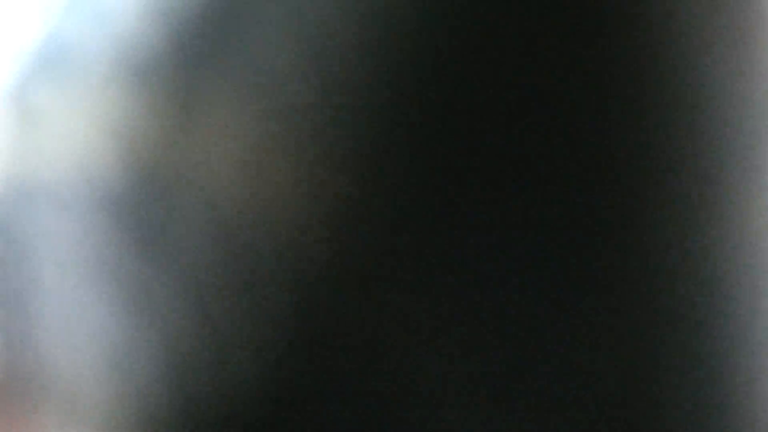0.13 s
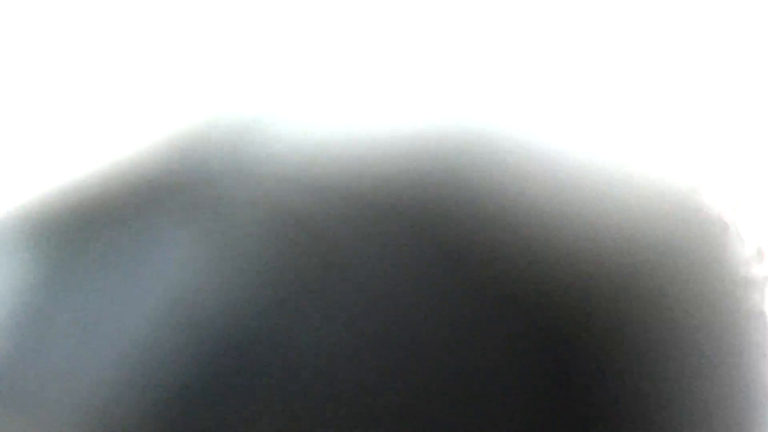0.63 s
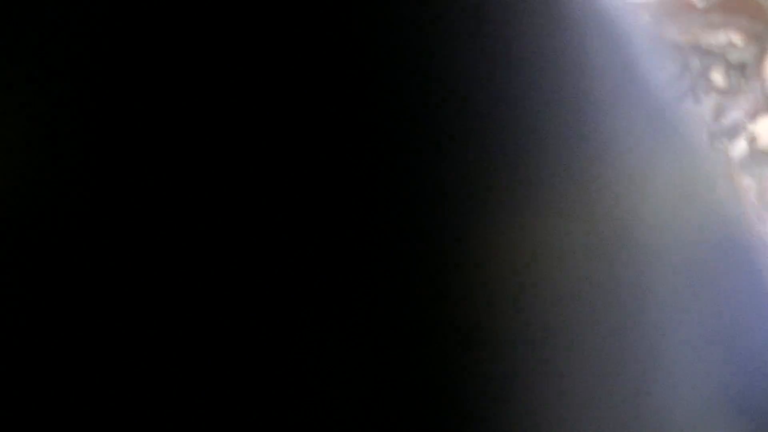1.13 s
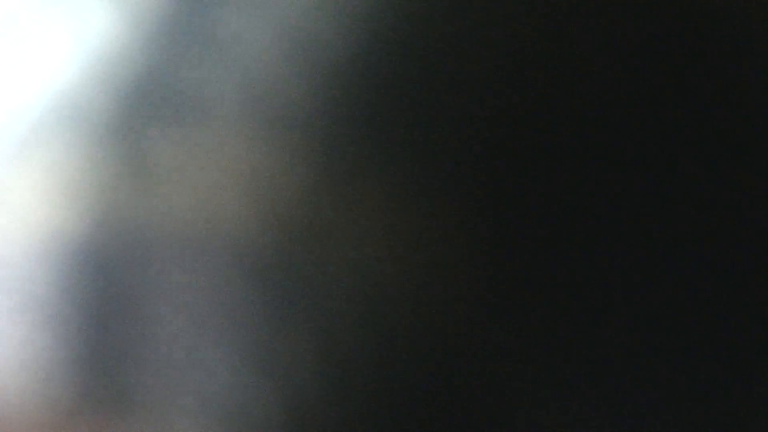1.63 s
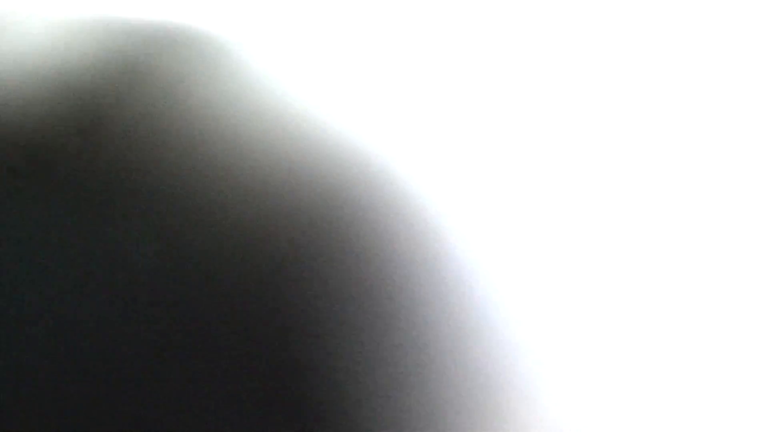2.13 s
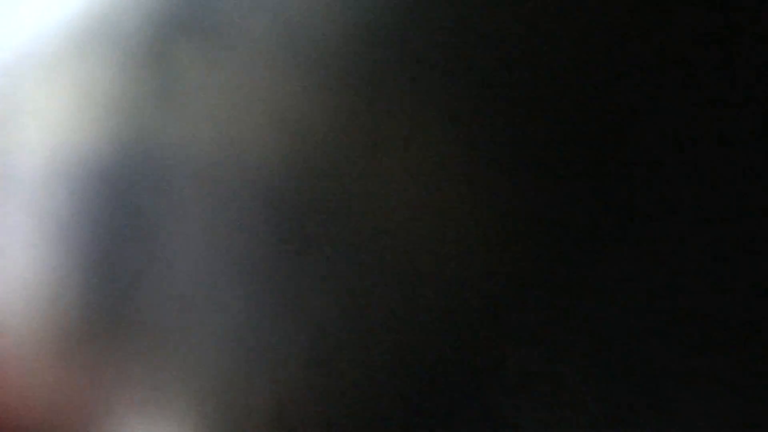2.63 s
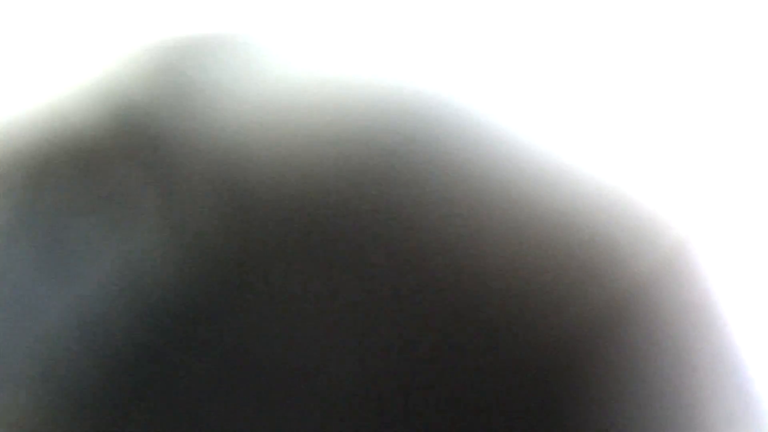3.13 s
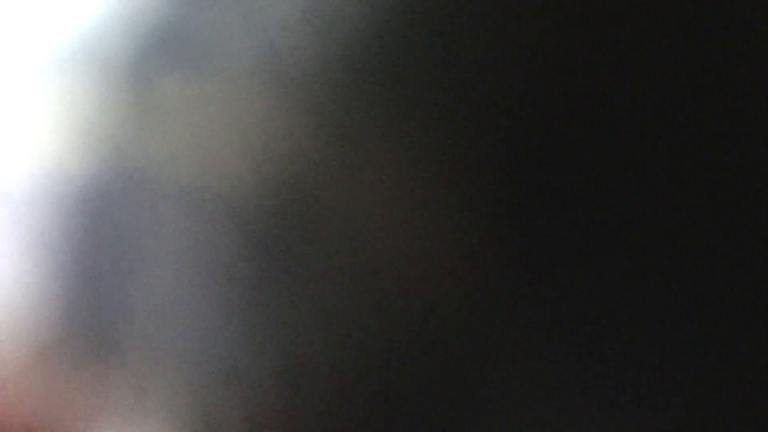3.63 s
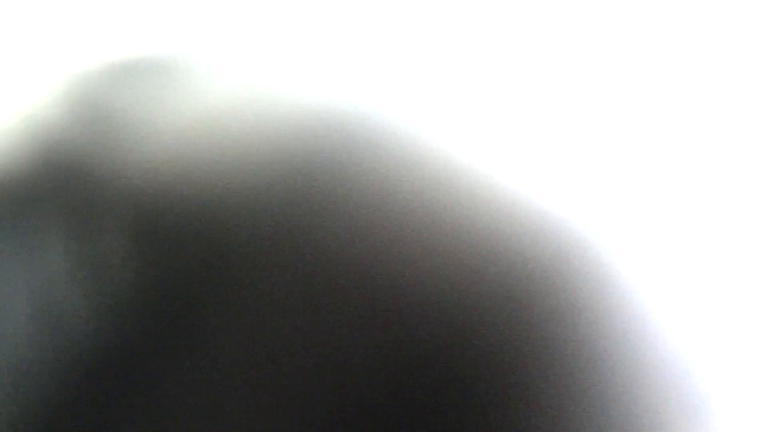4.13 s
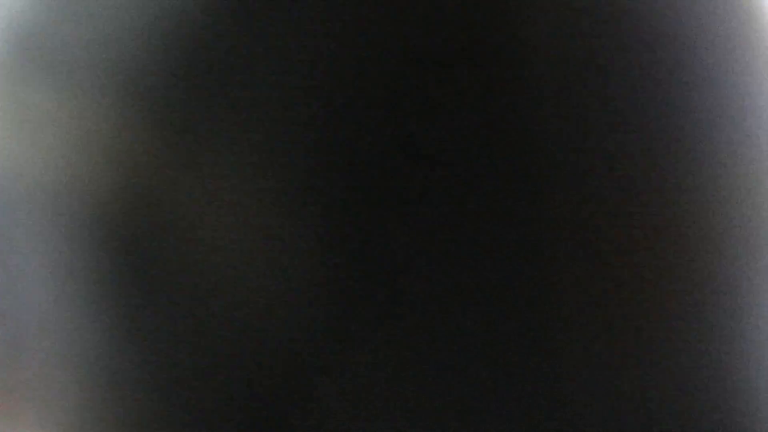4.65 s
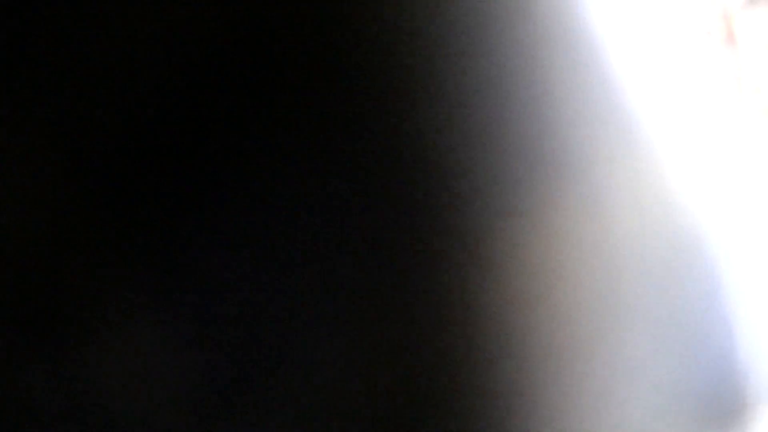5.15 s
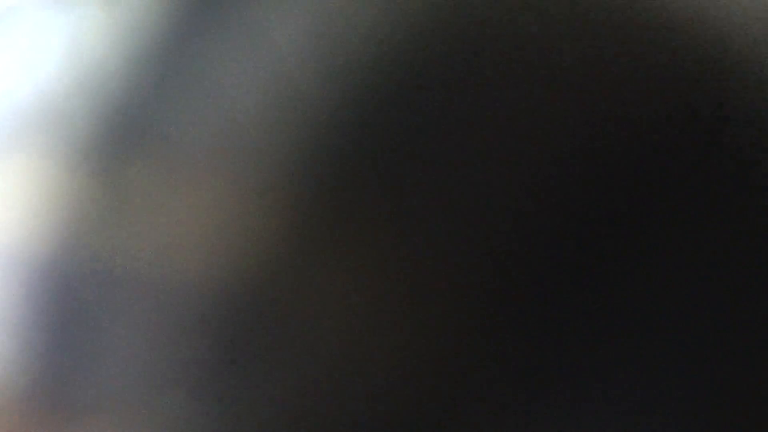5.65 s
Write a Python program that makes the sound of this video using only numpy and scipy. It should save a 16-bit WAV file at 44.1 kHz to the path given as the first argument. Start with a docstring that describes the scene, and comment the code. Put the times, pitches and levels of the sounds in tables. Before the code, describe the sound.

A hand rubs a plastic camera lens in quick scratchy circles right against the microphone, with sharp crackling snaps and dull handling thuds.

```python
"""Outdoors, a hand wipes a camera lens in quick circles right beside the built-in stereo microphone.
Stick-slip friction excites it: thousands of tiny slips a second ring the plastic lens barrel and rim,
or rustle softly over the glass as shaped noise. Skin catches and snaps free in short cracks, the grip
bumps the housing in damped low tones and rumbles through it as low-frequency noise, and a smooth wash
of noise over a wavering low drone lies underneath."""
import sys
import numpy as np
from scipy import signal
from scipy.fft import rfft, irfft, next_fast_len
from scipy.io import wavfile
from scipy.ndimage import uniform_filter1d

SR = 44100
rng = np.random.default_rng(int(sys.argv[2]) if len(sys.argv) > 2 else 0)


def how_loud(loudness_db):
    """Turn decibels into a plain amplitude multiplier (0 dB gives 1, 20 dB gives 10)."""
    steps = np.asarray(loudness_db, float) / 20
    return 10 ** steps


def master(y):
    """Save y as 16-bit WAV."""
    cut = np.clip(np.atleast_2d(y).T, -1, 1)
    pcm = np.round(cut * 32767)  # scale
    wavfile.write(sys.argv[1], SR, pcm.astype(np.int16))


N = 254456  # length [samples]


def evened(x):
    """Power normalization: scales a signal to rms 1."""
    return x / np.sqrt(np.mean(x ** 2) + 1e-20)


def read(points, hz):
    """Spectral envelope: interpolates levels along a log-frequency axis."""
    f, value = np.transpose(points)
    return np.interp(np.log(hz + 1), np.log(f + 1), value)


def add(mix, s, sound):
    """Linear superposition: mixes a two-channel sound in at time s."""
    part = mix[:, round(s * SR):][:, :sound.shape[1]]
    part += sound[:, :part.shape[1]]


def ring(modes, hz):
    """Modal resonance: gain of steep-sided resonances, with hollows between them."""
    power = sum(how_loud(db) ** 2 / (1 + (2 * (hz - f) / width) ** 2) ** 3 for f, width, db in modes)
    return np.sqrt(power)


# difference of the two ports: (frequency [Hz], left-right difference above what both share [dB])
SAME = [(60, -17), (92, -2), (140, -5.5), (210, -6.5), (330, -6.5), (500, -5), (770, -8), (1170, -3.5),
        (1790, -27.5), (2740, -2), (4190, -14), (6410, -3.5), (9810, -1), (15000, 2)]
# balance of the two ports: (frequency [Hz], left over right [dB])
LEFT = [(60, -4.0), (180, -1.5), (550, -1.5), (1650, -1.5), (4970, 0.5), (15000, -1.5)]


def ports(a, b, hz):
    """Interchannel coherence: two ports share spectrum a, differ by b; treble reaches the left first."""
    lead = np.clip(0.48 * hz ** 2 / (hz ** 2 + 5000 ** 2), 0, 1)
    # a quarter-cycle share of the common sound advances the left port's phase
    apart = how_loud(read(SAME, hz)) * (lead * 1j * a + np.sqrt(1 - lead ** 2) * b)
    tilt = how_loud(read(LEFT, hz) / 2)
    return np.array([(a + apart) * tilt, (a - apart) / tilt])


def murk(colour, patchy_db, size):
    """Filtered noise: random short-time spectra with drifting patches, at rms 1."""
    frames, hz = 4 * N // size + 5, np.fft.rfftfreq(size, 1 / SR)
    a, b, c, d, patches = rng.standard_normal((frames, len(hz), 5)).T
    patches = uniform_filter1d(patches, 4, axis=0)  # over frequency
    patches = evened(uniform_filter1d(patches, 3, axis=1))  # over time
    shape = how_loud(read(colour, hz)[:, None] + patchy_db * patches)
    spectra = ports(a + 1j * b, c + 1j * d, hz[:, None]) * shape
    noise = signal.istft(spectra, nperseg=size, noverlap=3 * size // 4)[1]
    return evened(noise[:, :N])


def swell(s, rise, fall, db):
    """Force envelope: power of one push that grows, peaks at s and lets go, every 64 samples."""
    t = np.arange(0, N + 64, 64) / SR - s
    growing = abs(t / max(rise, .003)) ** 1.294
    letting_go = abs(t / max(fall, .003)) ** 1.496
    down = np.where(t < 0, growing, letting_go)
    return how_loud(db - 24.5 * down) ** 2  # 24.5 dB down at its ends


def per_sample(power):
    """Amplitude from power: interpolates coarse power to a gain for every sample."""
    return np.interp(np.arange(N) / 64, np.arange(len(power)), np.sqrt(power))


# the grip tightening on the housing: (time of peak [s], rise [s], fall [s], rumble level [dB],
# deep shake relative to the rumble [dB])
SQUEEZES = [(.42, 0.058, .06, -44.5, -7), (.59, 0.031, 0.04, -38, -14.5), (.72, 0.16, 0.088, -49, -16),
            (1.54, 0.39, 0.062, -47.5, -17), (1.64, 0.083, 0.32, -52, -14), (1.87, 0.13, 0.18, -49, -4),
            (2.1, 0.11, 0.13, -50.5, -14), (2.51, 0.068, 0.41, -47, -7), (2.861, 0.059, 0.13, -53, -9),
            (3.01, .2, 0.08, -54, -15.5), (3.54, 0.2, 0.14, -47.5, -6.5), (4.11, 0.061, 0.074, -44, -20),
            (4.24, 0.1, 0.12, -52, -16), (4.6, 0.11, 0.26, -49.5, -18), (5.3, .12, 0.18, -45.5, -15),
            (5.399, 0.21, 0.072, -48.5, -9), (5.62, 0.21, 0.38, -65, -9.5)]


def grip(deep):
    """Structure-borne drive: gain of the squeezes, in the rumble or in the deepest band."""
    return per_sample(sum(swell(s, rise, fall, db + deep * deep_db)
                          for s, rise, fall, db, deep_db in SQUEEZES))


# colour of the outdoor wash: (frequency [Hz], relative density [dB])
WASH = [(60, -26), (300, -2), (450, -3), (700, -7), (1000, -9.5), (1800, -7.5), (4000, -4), (8800, -16),
        (14300, -28), (16400, -47)]
# colour of the drone and deep shake: (frequency [Hz], relative density [dB])
DRONE_COLOUR = [(20, -45), (38, -30), (56, 0), (75, -3), (105, -14), (160, -19), (300, -80)]


def outdoors():
    """Broadband noise: a smooth wash over a low drone that wavers and takes the grip's deep shake."""
    wash_db, drone_db, waver_db, waver_s = -48.5, -65.5, 2, .12
    wash = how_loud(wash_db) * murk(WASH, patchy_db=1, size=1024)
    span = round(waver_s * SR)
    waver = uniform_filter1d(rng.standard_normal(N), span)
    waver = evened(uniform_filter1d(waver, span))
    level = np.hypot(how_loud(drone_db + waver_db * waver), grip(True))
    return wash + level * murk(DRONE_COLOUR, patchy_db=-1.5, size=4096)


# colour of the rumble through the housing: (frequency [Hz], relative density [dB])
RUMBLE = [(60, -23), (110, -8), (180, -2), (257, -2), (330, -3.5), (450, -17.5), (700, -19.5), (2000, -78)]


def handling():
    """Structure-borne noise: lumpy low rumble of the hand on the housing."""
    hold_db = -59  # steady grip
    return np.hypot(grip(False), how_loud(hold_db)) * murk(RUMBLE, patchy_db=2.5, size=1024)


def bump(db, hz):
    """Damped oscillation: a soft low push that rocks the housing for a few cycles."""
    t = np.arange(3000) / SR
    onset = 1 - np.exp(-t / 0.0021)
    decay = how_loud(-60 * t / 0.039)  # 60 dB in 39 ms
    push = np.sin(2 * np.pi * hz * t) * onset * decay
    return how_loud(db + 9.5) * how_loud([[-1.5], [1.5]]) * push  # stronger on the right


# the grip bumping the housing: (time [s], relative level [dB], frequency [Hz])
BUMPS = [(0.398, -38, 214), (0.58, -34, 238), (0.698, -40, 260), (1.29, -48, 117), (1.508, -45, 257.9),
         (2.09, -48, 230.4), (2.509, -40, 263), (2.657, -41, 176.1), (2.851, -46, 184.2), (4.105, -41, 132),
         (4.773, -44.5, 101.9), (5.281, -46, 252)]


def bumps(mix):
    """Impact excitation: adds each bump of the grip at its onset."""
    for s, db, hz in BUMPS:
        add(mix, s, bump(db, hz))


# resonances of the pressed barrel: (frequency [Hz], width [Hz], relative level [dB])
BARREL = [(430, 290, -19.5), (920, 1300, -22), (1660, 700, -11), (2080, 496, 2), (3547, 660, 1.5),
          (4250, 1090, 3), (5160, 1500, -0.5), (6400, 1850, -11.5)]
# colour of the airborne fizz and bright edges: (frequency [Hz], relative density [dB])
FIZZ = [(3820, -81.5), (6500, -2), (7330, -4.5), (7950, -1), (11200, -4), (15100, -14), (15900, -17),
        (16400, -42)]
LEAD_IN, PEAK_S = 128, .0004  # before a crack's start [samples], from its start to its peak [s]


def snap(db, hz, edge_db):
    """Impulsive release: a crack of a few cycles with a bright edge, barrel ringing and scatter."""
    t, bins_hz = (np.arange(1024) - LEAD_IN) / SR, np.fft.rfftfreq(1024, 1 / SR)
    crack = np.cos(2 * np.pi * hz * t) * np.exp(-((t - PEAK_S) / 0.00024) ** 2)
    knock = np.cos(2 * np.pi * 3300 * t) * np.exp(-((t - .0006) / 0.00036) ** 2)
    crack += how_loud(-17) * knock
    # the duller cracks come through the barrel and take its hollow
    on_barrel = np.clip((5100 - hz) / 500, 0, 1)
    hollow = irfft(rfft(crack) * ring(BARREL, bins_hz))
    crack = (1 - on_barrel) * crack + on_barrel * hollow / abs(hollow).max()

    noise = rfft(rng.standard_normal((6, 1024)))
    edge = evened(irfft(ports(noise[0], noise[1], bins_hz) * how_loud(read(FIZZ, bins_hz))))
    barrel = evened(irfft(ports(noise[2], noise[3], bins_hz) * ring(BARREL, bins_hz)))
    scatter = evened(irfft(ports(noise[4], noise[5], bins_hz) * abs(rfft(crack))))

    edge = how_loud(edge_db) * edge * np.exp(-((t - PEAK_S) / 0.00082) ** 2)
    start = np.maximum(1 - np.exp(-t / 0.00041), 0)
    # 60 dB of decay in 8.2 ms for the barrel, 14 ms for the scatter
    tail = how_loud(-19.5 - 60 * t / 0.0082) * barrel + how_loud(-6 - 60 * t / 0.014) * scatter
    return how_loud(db) * (crack + edge + start * tail)


# skin catching and snapping free: (time of peak [s], relative level [dB], crack frequency [Hz],
# bright edge relative to the crack [dB])
SNAPS = [(0.0734, -12.5, 5000, -12), (0.5762, -18, 4130, -23), (0.9259, -8.5, 4250, -15.5),
         (0.9523, -14, 4480, -17), (1.1053, -16.5, 6240, -9), (1.2073, -25.5, 6100, -13),
         (1.465, -21, 6350, -16), (1.571, -1.5, 5500, -20), (1.9128, -8.5, 4906, -16),
         (1.916, -15, 4580, -26), (1.9363, -11, 3944, -24), (2.09, -2.5, 5010, -18.5),
         (2.114, -1, 4075, -30), (2.155, -4, 4500, -35), (2.2047, -5, 4332, -28), (2.2341, -1, 4540, -32),
         (2.2436, 0, 4390, -27.5), (2.2813, -10.5, 4197, -29), (2.3438, -15, 7150, -12),
         (2.684, -10.5, 4980, -2), (3.194, -13, 4240, -13.5), (3.2265, 0.1, 4615, -23),
         (3.2388, -9, 3900, -22.5), (3.326, -20, 5590, -17), (3.4158, -26, 6000, -10),
         (3.492, -15, 3974, -33), (3.6146, -10, 5795, -10.5), (3.6609, -16, 5560, -22),
         (3.6721, -13.5, 5600, -18), (4.1338, -10.5, 5000, -19), (4.2841, -13.5, 4497, -18.5),
         (4.2981, -6, 4085, -15), (4.305, -3.5, 4946, -25), (4.3331, -8.5, 4475, -21),
         (4.3689, -16, 4640, -22), (4.516, -29, 4405, -13), (4.676, -2.5, 5260, -21),
         (4.8579, -29, 4660, -21), (5.213, -24, 4360, -7), (5.2337, -11, 5860, -12),
         (5.4474, -19, 6280, -9.5), (5.4535, -3, 5760, -11), (5.4812, -1.5, 5690, -13.5),
         (5.649, -33.5, 5220, -5)]


def snaps(mix):
    """Stick-slip release: adds each crack so that it peaks at its listed time."""
    for s, db, hz, edge_db in SNAPS:
        add(mix, s - PEAK_S - LEAD_IN / SR, snap(db, hz, edge_db))


# strokes of the hand: (time of most pressure [s], rise [s], fall [s], rubbing level [dB],
# place [0 barrel, 1 rim, 2 or more glass, blends between], airborne fizz relative to the rubbing [dB])
STROKES = [(0.0, .05, 0.061, -22.5, 0.073, -18), (0.073, 0.059, 0.0061, -30.5, 3, -5.5),
           (.19, 0.057, 0.19, -30.5, 0.9, -10), (.31, 0.076, .15, -28, 1.84, -14),
           (0.471, 0.16, 0.048, -22, 1.02, -12.5), (.6, 0.056, 0.19, -26, 0.18, -16),
           (.7, 0.14, 0.14, -16, 0.05, -12.5), (.79, 0.067, 0.14, -17.5, 0.009, -18),
           (0.866, 0.16, 0.065, -18, .01, -17), (.96, 0.095, 0.11, -27, .2, -15.5),
           (1.174, 0.37, 0.012, -32.5, 0.99, -7), (1.29, 0.17, 0.21, -49.5, 2, -17),
           (1.45, 0.087, 0.097, -35, 0.72, -8.5), (1.545, 0.062, 0.059, -16.5, 1.18, -8.5),
           (1.612, 0.089, 0.028, -29, 1.36, -22), (1.811, 0.16, 0.078, -28.5, 1.85, -12.5),
           (1.89, 0.12, 0.044, -33.5, 1.66, -8), (1.915, .012, 0.023, -20.5, 0.38, -13.5),
           (1.949, 0.084, 0.22, -28.5, 0.056, -15.5), (2.0, 0.022, 0.033, -28.5, 0.032, -10),
           (2.11, 0.098, 0.076, -14, 0.0076, -15.5), (2.158, 0.058, 0.041, -19, 0.0099, -17),
           (2.23, 0.096, 0.029, -19.5, 0.011, -16), (2.289, 0.096, 0.067, -31, 0.095, -16),
           (2.335, 0.14, 0.034, -33, 1.15, -1.4), (2.41, .05, 0.06, -43, 1.05, -6),
           (2.51, 0.071, 0.18, -20, 0.99, -9), (2.588, 0.14, 0.039, -20.5, 0.89, -7.5),
           (2.681, 0.046, 0.018, -31.5, 1.1, 1.5), (2.69, 0.16, 0.24, -32, 2.05, -11.5),
           (2.87, 0.33, 0.15, -33.5, 2.7, -12.5), (2.96, 0.046, 0.13, -20, 0.0077, -16),
           (3.014, 0.088, .08, -26.5, 0.091, -11), (3.154, 0.049, 0.051, -20, 0.0097, -16.5),
           (3.23, 0.061, 0.034, -19, 0.011, -16), (3.321, 0.17, 0.051, -35, 1.7, -9),
           (3.45, 0.063, 0.24, -39.5, 0.83, -4.5), (3.575, 0.15, .05, -22, 1.065, -12),
           (3.612, .04, .022, -30, 1.6, -6), (3.71, 0.09, 0.044, -32, 1.9, -12),
           (3.79, 0.048, 0.25, -40.5, 1.9, -10), (3.97, 0.09, 0.19, -35, 1.3, -10),
           (4.1, 0.057, 0.056, -20.5, 0.025, -15.5), (4.222, .042, 0.14, -23, 0.022, -18.5),
           (4.3, 0.15, 0.14, -27.5, 0.011, -23), (4.446, 0.099, .04, -29.5, 1.11, -7),
           (4.577, 0.048, 0.14, -28.5, 0.97, -11), (4.676, 0.095, 0.031, -20.5, 1.24, -9),
           (4.714, 0.082, 0.12, -32, 1.67, -21), (4.98, .15, 0.11, -36.5, 1.5, -19),
           (5.09, 0.05, 0.14, -34.5, 1.42, -6.5), (5.16, 0.042, .06, -28, 1, -7),
           (5.347, 0.13, 0.097, -21.5, 0.94, -8.5), (5.425, 0.12, 0.054, -27, 1.2, -10),
           (5.475, 0.051, .014, -38, 1.9, -15), (5.565, 0.072, 0.064, -40, 1.22, -11),
           (5.714, 0.21, 0.19, -41.5, 1.86, -11)]


def pressure():
    """Friction drive: gains with which the strokes drive barrel, rim, glass and fizz."""
    power = 0
    for s, rise, fall, db, place, fizz_db in STROKES:
        barrel, glass = np.clip([1 - place, place - 1], 0, 1)
        shares = [barrel, 1 - barrel - glass, glass]
        rubbing = np.outer(shares, swell(s, rise, fall, db))
        late = 0.049 * fall  # the fizz peaks later and stops sooner
        fizz = swell(s + late, rise + late, 0.89 * fall, db + fizz_db)
        power = power + np.vstack([rubbing, fizz])
    resting = how_loud([-97.5, -65.5, -67.5, -71.5]) ** 2  # the hand at rest
    return np.array([per_sample(p + r) for p, r in zip(power, resting)])


# resonances of the rim round the glass: (frequency [Hz], width [Hz], relative level [dB])
RIM = [(247, 210, -19.5), (800, 15000, -32.5), (2165, 400, -5.5), (2833, 1150, -7.5), (3900, 960, 0.5),
       (5000, 3900, -7), (5570, 1530, -5.5), (8000, 1760, -18.5)]
# colour of light strokes on the glass: (frequency [Hz], relative density [dB])
GLASS = [(600, -57), (1500, -15.5), (2050, -3.5), (2700, 1.5), (3200, 2.5), (4200, 1.5), (6000, -4.5),
         (7500, -20), (10000, -37), (16000, -87)]


def wiping():
    """Stick-slip friction: random slips at moving spots, each with its own scattered path to each port."""
    slips_per_s, spots_per_s = 5000, 150  # mean slip rate, hand speed at full level
    spots, near = 24, 5  # all spots, those under the hand at one moment
    drive = pressure()
    rubbing = (drive[:-1] ** 2).sum(0)

    clumps = uniform_filter1d(rng.standard_normal(N), 150)  # ridges of the skin
    clumps = evened(uniform_filter1d(clumps, 150))
    on_barrel = drive[0] ** 2 / rubbing
    spread_db = 0.91 + 1.07 * on_barrel  # skin catches harder on the barrel
    steady = np.sqrt(1.5 - spread_db * np.log(10) / 10)  # offsets the power that uneven sizes add
    uneven = np.minimum(rng.exponential(1, N), 6)
    size = steady * how_loud(spread_db * uneven + 1.24 * clumps)
    slips = size * (rng.random(N) < slips_per_s / SR) * rng.choice([-1, 1], N)

    travel = np.cumsum(np.sqrt(rubbing) ** .3) / SR * spots_per_s  # faster when rubbing hard
    spot = np.floor(travel + rng.random(N)).astype(int)
    spot = (spot + rng.integers(0, near, N)) % spots

    length = next_fast_len(N + 2048)
    hz = np.fft.rfftfreq(length, 1 / SR)
    decay = how_loud(-60 * np.arange(512) / SR / 0.0059)  # 60 dB in 5.9 ms
    paths = rng.standard_normal((spots, 2, 512)) * decay
    a, b = sum(rfft(slips * (spot == k), length) * rfft(paths[k], length) for k in range(spots))
    heard = ports(a, b, hz)

    colours = ring(BARREL, hz), ring(RIM, hz), how_loud(read(GLASS, hz)), how_loud(read(FIZZ, hz))
    return sum(gain * evened(irfft(heard * colour, length)[:, :N])
               for gain, colour in zip(drive, colours))


def scene():
    """Superposition: outdoor wash, rumble, bumps and snaps under the wiping."""
    mix = outdoors() + handling() + wiping()
    bumps(mix)
    snaps(mix)
    return mix


def band_limit(x):
    """A steep low-pass at the top of the band."""
    return signal.sosfilt(signal.butter(12, 16510, fs=SR, output="sos"), x)


def record(dry):
    """Band limiting and saturation: a steep low-pass, then soft overload on the loudest cracks."""
    low_pass = signal.firwin(255, 16400, fs=SR)  # taps, edge [Hz]
    limited = signal.oaconvolve(dry, low_pass[None], "same", axes=1)
    finished = 0.89 * np.tanh(limited / 1.027)
    return band_limit(finished)


dry = scene()
out = record(dry)
master(out)
```